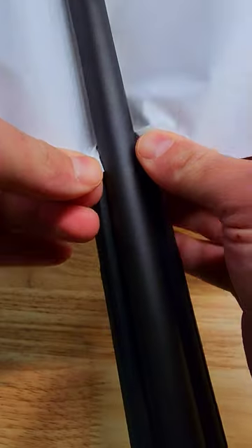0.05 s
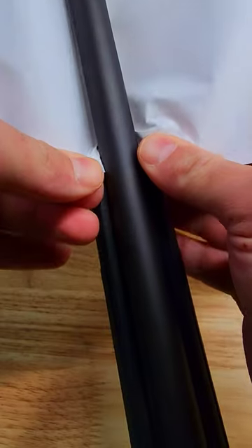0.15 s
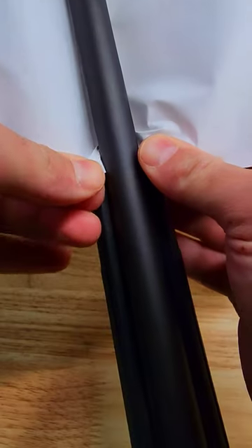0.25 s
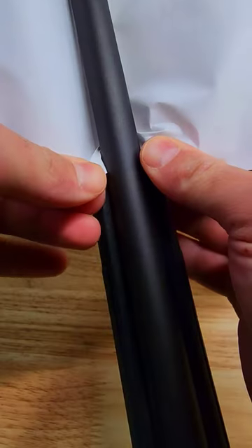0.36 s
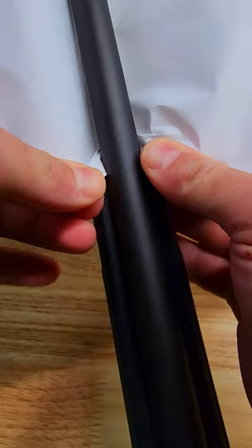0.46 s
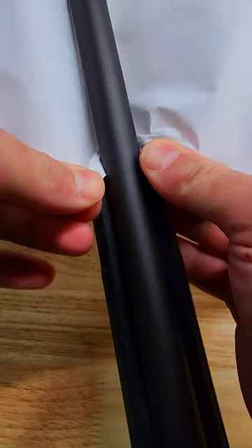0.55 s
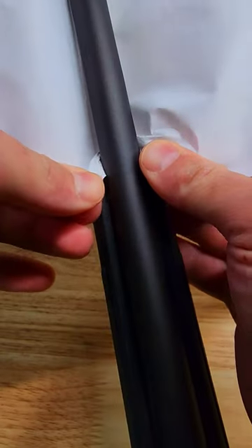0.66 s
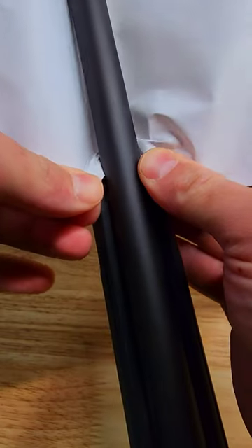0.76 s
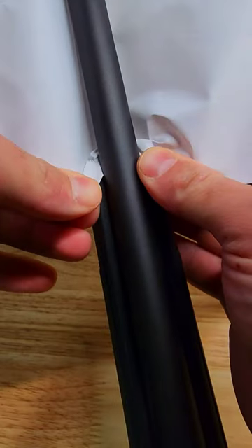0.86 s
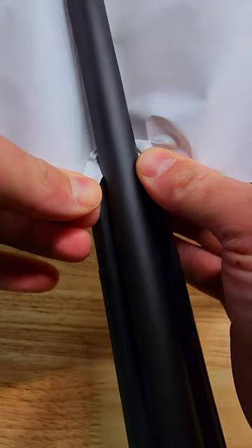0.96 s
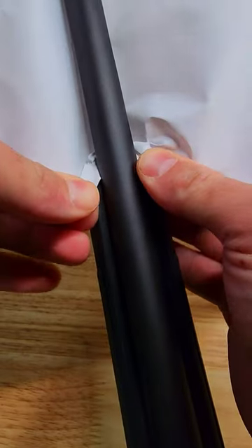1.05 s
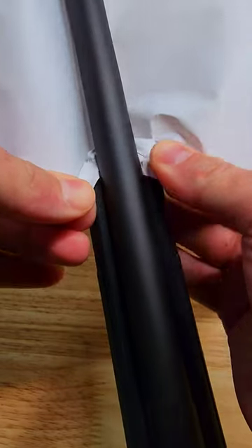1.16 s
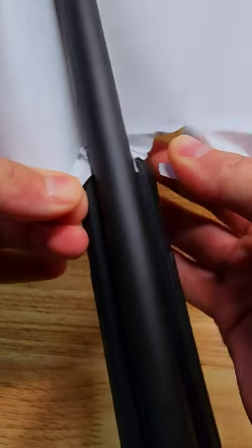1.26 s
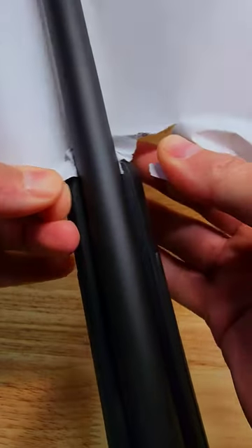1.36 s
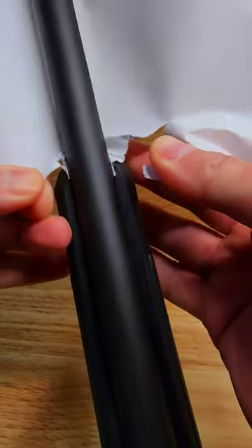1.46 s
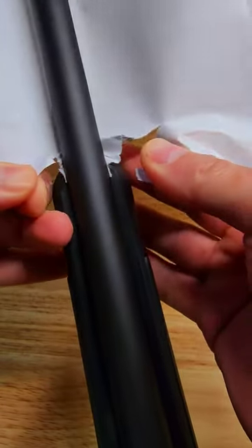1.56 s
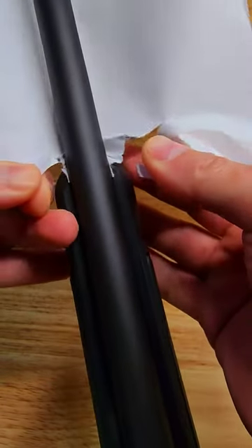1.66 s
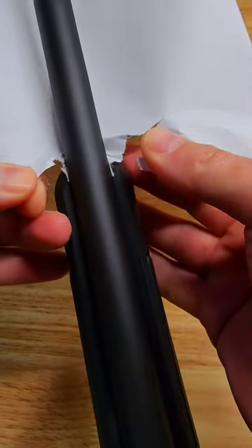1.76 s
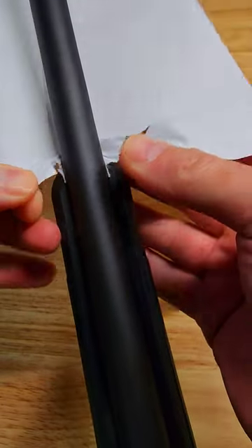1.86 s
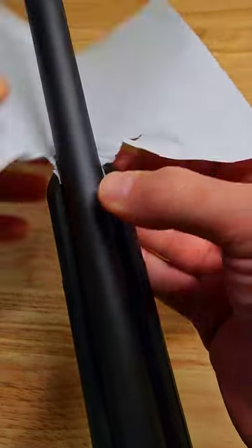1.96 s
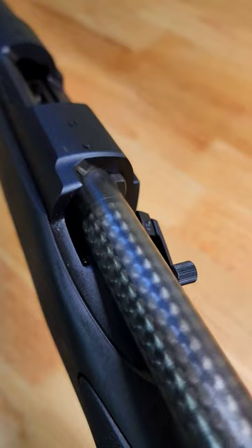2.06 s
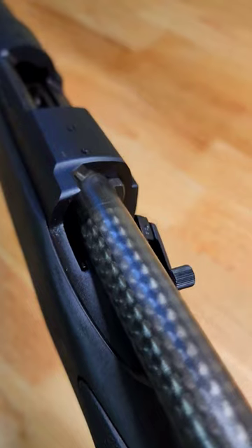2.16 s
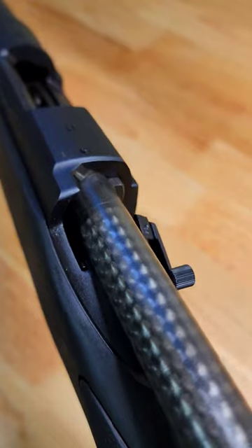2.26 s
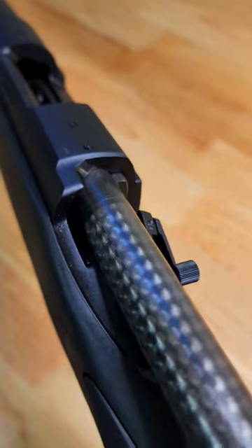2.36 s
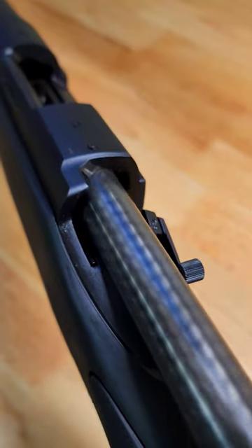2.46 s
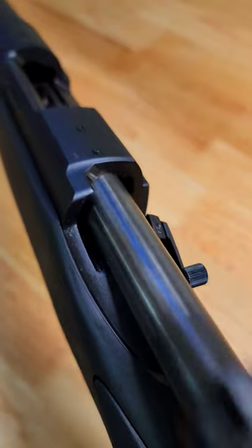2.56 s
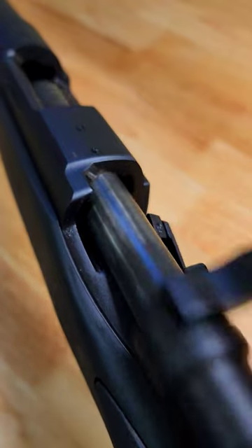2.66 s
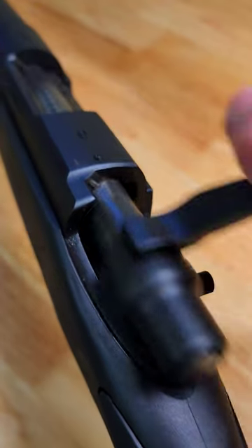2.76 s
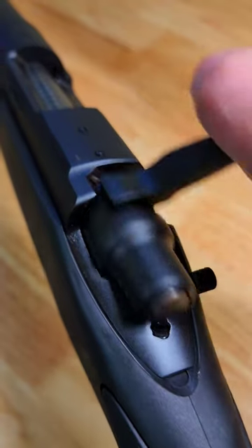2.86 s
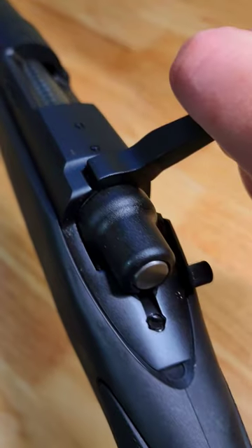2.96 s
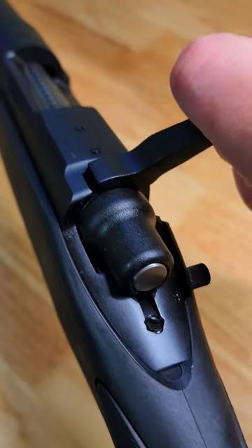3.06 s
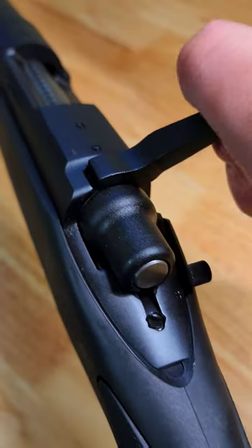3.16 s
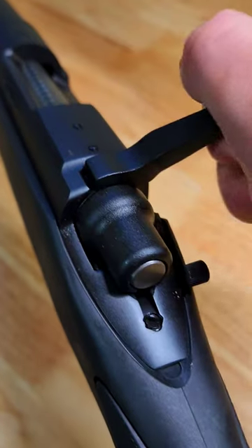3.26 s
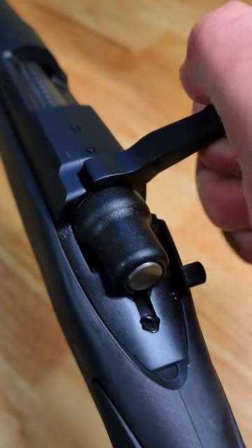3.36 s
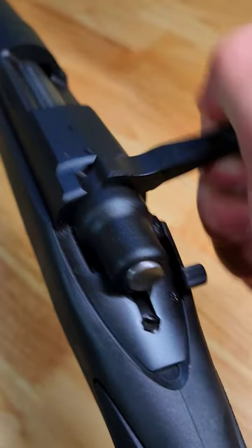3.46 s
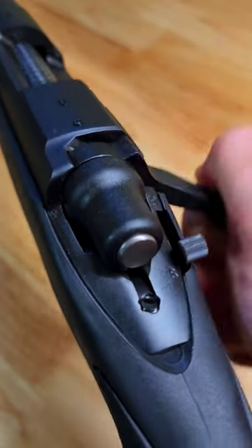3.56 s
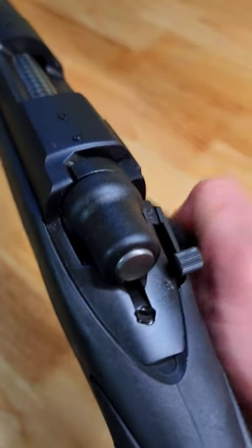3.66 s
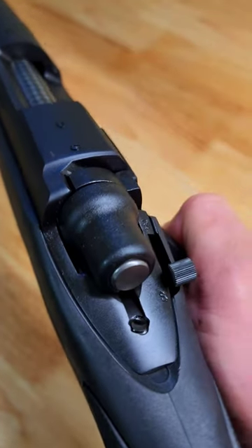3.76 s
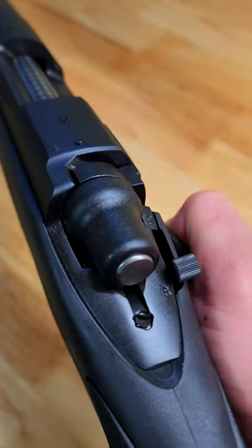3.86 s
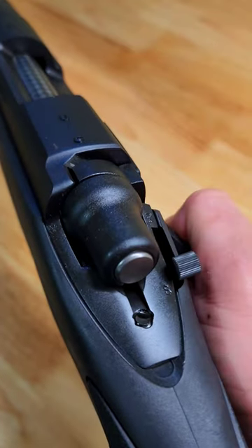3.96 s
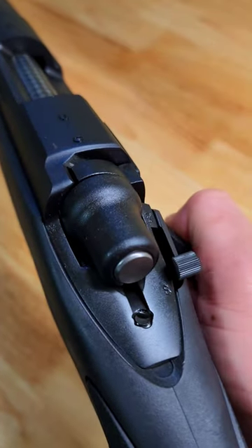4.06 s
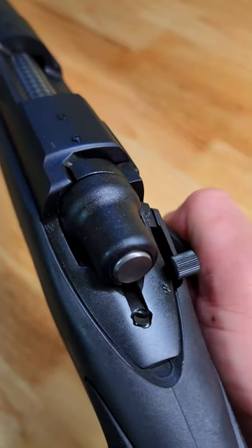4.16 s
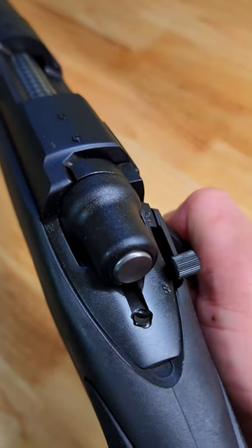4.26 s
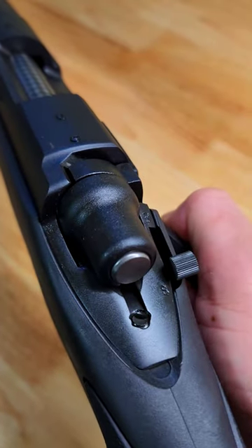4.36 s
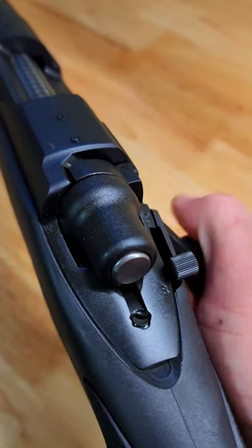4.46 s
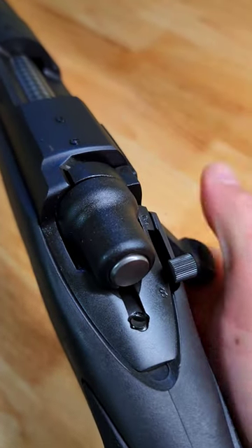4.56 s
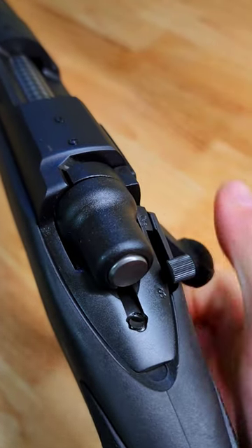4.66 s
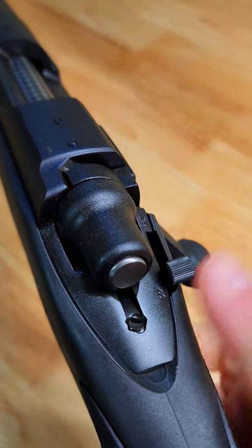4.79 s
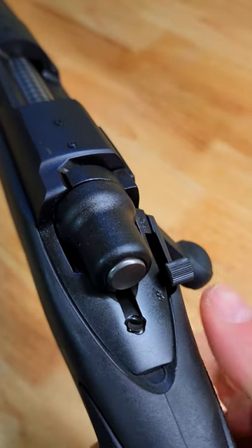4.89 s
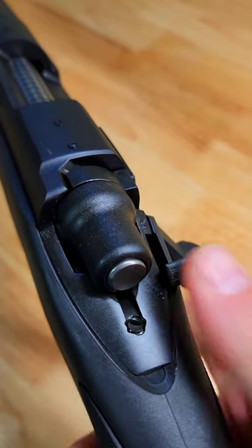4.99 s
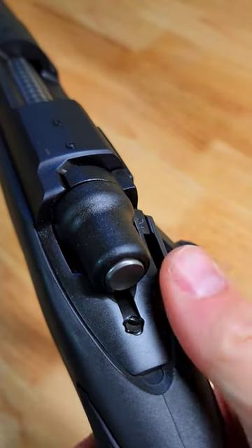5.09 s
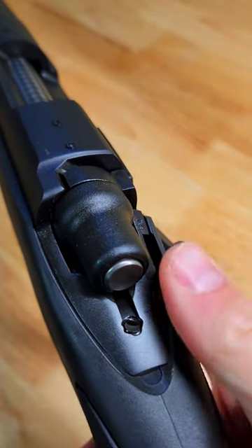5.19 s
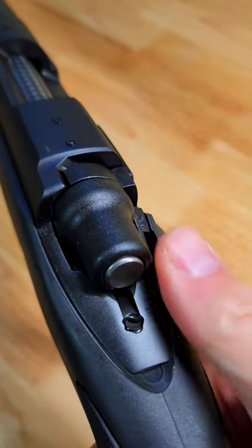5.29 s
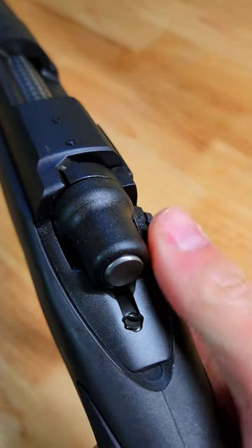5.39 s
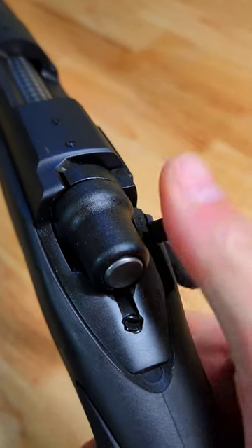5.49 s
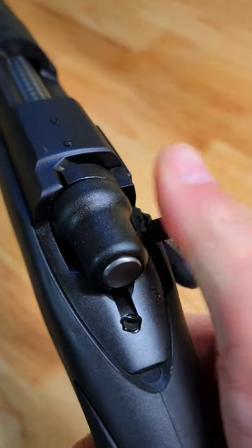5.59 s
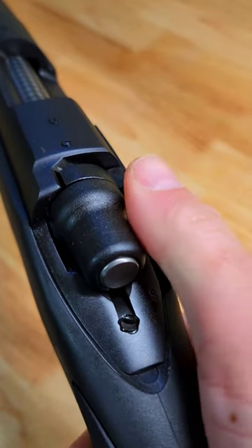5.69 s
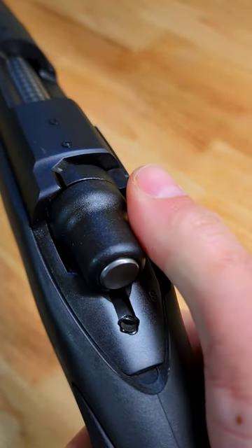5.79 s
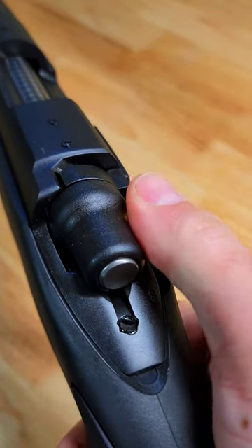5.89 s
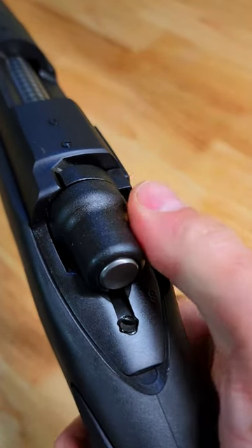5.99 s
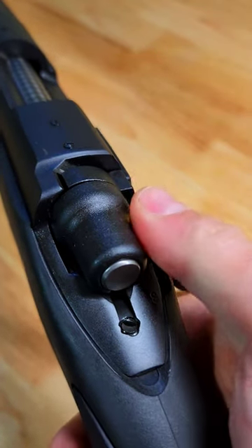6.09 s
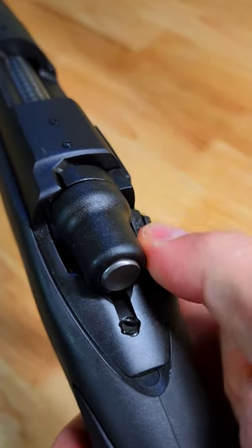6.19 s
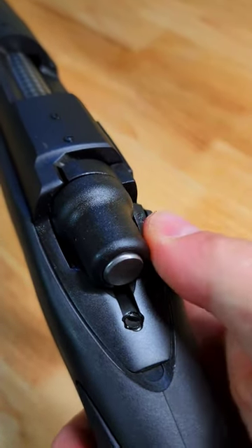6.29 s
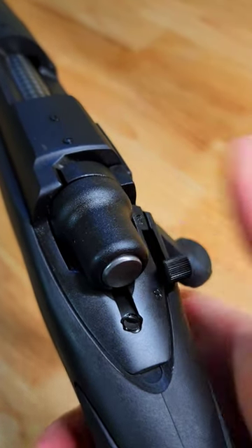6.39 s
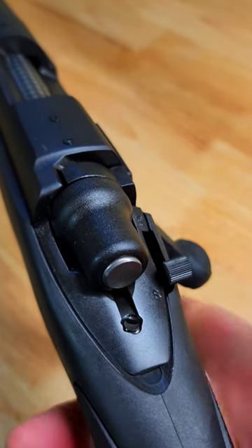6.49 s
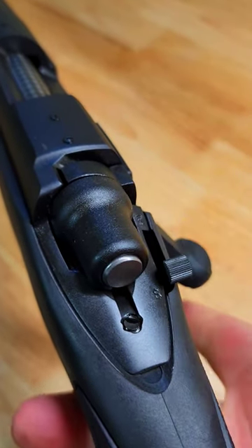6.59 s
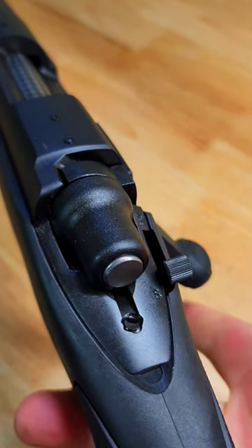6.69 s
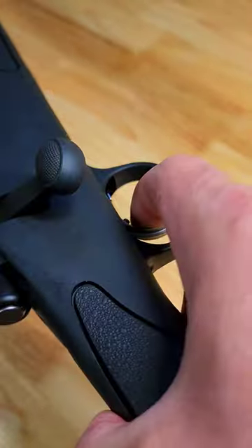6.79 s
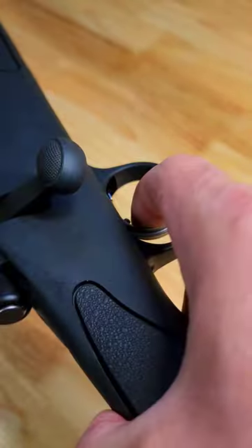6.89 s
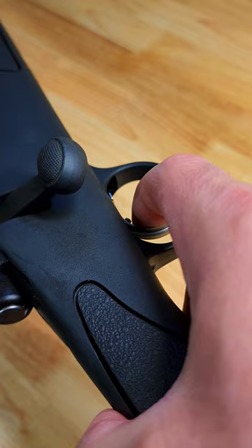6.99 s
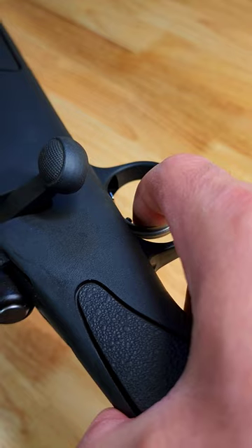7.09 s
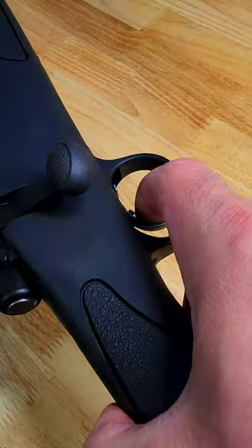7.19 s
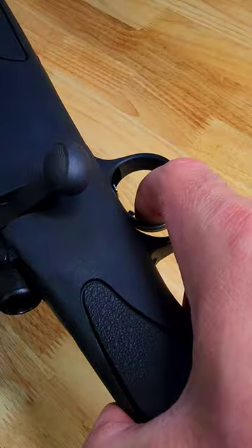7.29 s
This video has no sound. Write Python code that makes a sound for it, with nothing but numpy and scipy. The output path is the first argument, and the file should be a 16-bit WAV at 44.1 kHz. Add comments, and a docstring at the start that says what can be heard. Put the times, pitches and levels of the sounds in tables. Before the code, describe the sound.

Close indoor handling: crackling paper tears and stops abruptly, a steel bolt slides and locks, then two sharp safety lever clicks over quiet hum.

```python
"""Bolt-action rifle checked by hand

A sheet of paper dragged under the barrel rustles, snaps, rips and pops until its sound stops abruptly.
Then the bolt slides back and forward and locks, and a thumb pushes the safety lever on and off.
Friction is noise driven by tiny slips; blows are noise bursts with decaying modes of the struck part.
A small room echoes paper and action; handling sounds, still air, hum and a thin hiss lie beneath."""
import sys
import numpy as np
from scipy import signal
from scipy.io import wavfile
from scipy.ndimage import uniform_filter1d

SR = 44100
rng = np.random.default_rng(int(sys.argv[2]) if len(sys.argv) > 2 else 0)


def log_audio(samples):
    """Write samples as a 16-bit WAV file to the path given in sys.argv[1]."""
    # one column per channel
    frames = np.atleast_2d(samples).T
    # limit to full scale, then quantise
    limited = np.clip(frames, -1, 1)
    pcm = np.round(limited * 32767).astype(np.int16)
    wavfile.write(sys.argv[1], SR, pcm)


N = 323694
TIME = np.arange(N) / SR
# filters about a third of an octave wide
CENTRES = np.geomspace(32, 15000, 27)
BANK = [signal.butter(2, [hz / 1.13, hz * 1.13], "band", fs=SR, output="sos") for hz in CENTRES]


def paper():
    """Stick-slip friction and tearing: the sheet drags between barrel and stock, catches, rips and buckles."""
    drag = paper_drag()
    return np.array([panned(drag, 3.8), drag / 2]) + paper_blows()


# pulls on the sheet: (start [s], length [s], body [dB], hiss relative to body [dB])
PAPER_PULLS = [(.243, 0.048, -35.5, -6), (.335, 0.032, -37, -11), (.42, 0.72, -45, -12),
               (.98, 0.15, -43, -10), (1.255, 0.09, -44, -7), (1.47, 0.27, -41.5, -3.5),
               (1.98, 0.13, -41.5, 1.5)]
# envelope of a pull: (rise [dB/s], sag while it lasts [dB/s], release [dB/s])
PAPER_SHAPE = (940, 31, 360)
# colour of the sliding sheet: (frequency [Hz], relative density [dB per Hz])
PAPER_COLOUR = [(71, -36.5), (120, 1), (283, 5), (472, -5), (711, 1), (1100, -10.5), (1500, -9),
                (3000, -13), (8270, -16), (15900, -36)]
# rubs that wake the taut sheet: (start [s], length [s], level [dB], centre [Hz], width [octaves])
SHEET_DRONES = [(.34, 0.014, -38.5, 680, 0.48), (.6, 0.064, -44.5, 648, 0.48)]


def paper_drag():
    """Sliding friction: slips excite the sheet, its fibres break, and it drones and squeaks under tension."""
    rustle = friction(PAPER_PULLS, PAPER_SHAPE, PAPER_COLOUR,
                      slips_per_s=700, spread_db=3, slip_s=0.0022, smooth=0.8)
    return rustle + crackle() + resonant_rubs(SHEET_DRONES) + squeak()


# runs of fibres giving way under strain: (start [s], length [s], level [dB])
FIBRE_RUNS = [(0.428, 0.2, -52.5), (0.624, .014, -44), (0.65, .01, -48), (0.948, 0.06, -35),
              (1.268, 0.14, -44.5)]
FIBRES_PER_S, FIBRE_SPREAD_DB, FIBRE_DECAY_S = 400, 4, .0009
FIBRE_HZ, FIBRE_Q = (7900, 11900), 2.5   # broad resonances of a break


def crackle():
    """Random fracture: fibres break at random moments, each with a tiny bright tick of its own size."""
    sizes = from_db(FIBRE_SPREAD_DB * np.minimum(rng.exponential(1, N), 2))
    breaks = (rng.random(N) < FIBRES_PER_S / SR) * sizes
    envelope = signal.lfilter([1], [1, -np.exp(-1 / (FIBRE_DECAY_S * SR))], breaks + 1e-18)
    ticks = envelope * rng.standard_normal((2, N))
    bright = sum(signal.lfilter(*signal.iirpeak(hz, FIBRE_Q, fs=SR), ticks) / (k + 1)
                 for k, hz in enumerate(FIBRE_HZ))
    return rms_one(bright) * loudest_stroke(FIBRE_RUNS, RUB_SHAPE)


SQUEAK_S, SQUEAK_LENGTH_S, SQUEAK_DB = 2.046, 0.068, -43
SQUEAK_HZ, SQUEAK_RISE_HZ_PER_S, SQUEAK_WOBBLE_HZ = 1610, 2300, 75


def squeak():
    """Tonal stick-slip: the last pull squeaks against the barrel, wavering and rising in pitch."""
    wobble = rms_one(uniform_filter1d(rng.standard_normal(N), size=60))
    rise = SQUEAK_RISE_HZ_PER_S * np.clip(TIME - SQUEAK_S, 0, SQUEAK_LENGTH_S)
    hz = SQUEAK_HZ + rise + SQUEAK_WOBBLE_HZ * wobble
    tone = np.sqrt(2) * np.sin(2 * np.pi * np.cumsum(hz) / SR)
    return from_db(SQUEAK_DB) * stroke(SQUEAK_S, SQUEAK_LENGTH_S, PAPER_SHAPE) * tone


# blows of the sheet as it snaps, crinkles, buckles and rasps;
# among the pops, the weak one at 1.635 s is an early echo of the big pop before it:
# (time [s], level before the gains below [dB], contact [s], brightness [dB per octave])
PAPER_SNAPS = [(.8882, -3.5, 0.0003, 0.36)]
PAPER_TICKS = [(.783, -33.5, 0.00086, 1.2), (.864, -22.5, .003, 0), (.9052, -13, 0.0014, 0.48),
               (.9368, -3, 0.0029, 0.54), (.9497, -6, 0.0004, 1.3), (.9562, -7.5, 0.00034, 0.57),
               (.995, -21.5, .001, 1.5), (1.231, -39.5, 0.0011, 1.3), (1.314, -11.5, 0.0052, 0),
               (1.327, -11.5, .0038, .4)]
PAPER_POPS = [(1.6131, -2.5, 0.00059, 6.5), (1.635, -31, 0.0017, -8), (1.888, -21, 0.0022, -2),
              (1.8945, -23.5, 0.0024, -2.5), (1.941, -24.5, 0.003, 4.5), (1.9645, -19.5, 0.0023, -3.5),
              (2.042, -24.5, 0.0054, 2)]
PAPER_RASPS = [(1.3865, -7, 0.046, 0.8), (1.442, -16.5, 0.0093, -0.4), (1.514, -20.5, 0.019, -3),
               (1.807, -38, 0.027, 1), (2.126, -19, 0.012, -0.5)]
# colour of each contact: (frequency [Hz], relative density [dB per Hz])
SNAP_COLOUR = [(94, -28.5), (160, 2), (270, -1.5), (419, -13), (700, -4), (2610, -6), (7510, -7.5),
               (10000, -30.5), (11900, -17), (15900, -38)]
TICK_COLOUR = [(88, -24), (150, -1.5), (900, -17), (3470, -15.5), (8520, -6), (15900, -16)]
POP_COLOUR = [(100, -14), (400, -14), (1100, -3), (2000, -4), (7400, -17), (11800, -24.5), (16000, -67)]
# ringing of the taut sheet: (frequency [Hz], relative level [dB], t60 [s])
SHEET_MODES = [(662, -1, .021), (1400, -15, .018)]
# short, strong clack of a snap: (frequency [Hz], relative level [dB], t60 [s])
SNAP_CLACK = [(1500, -3.5, 0.018), (2550, -8.5, 0.031)]


def paper_blows():
    """Impulsive excitation: short noise bursts of the sheet, each with its modes ringing."""
    snaps = blows(PAPER_SNAPS, SNAP_COLOUR, SHEET_MODES, decay_s=0.0025,
                  gain_db=15, ring_db=-11, room_db=1.5, pan_db=4, clack=SNAP_CLACK)
    ticks = blows(PAPER_TICKS, TICK_COLOUR, SHEET_MODES, decay_s=0.0013,
                  gain_db=11, ring_db=-16.5, room_db=7, pan_db=7)
    pops = blows(PAPER_POPS, POP_COLOUR, SHEET_MODES, decay_s=0.0041,
                 gain_db=9.5, ring_db=4.5, room_db=0.5, pan_db=3.5)
    rasps = blows(PAPER_RASPS + rip(count=7), SNAP_COLOUR, SHEET_MODES, decay_s=0.0013,
                  gain_db=22.5, ring_db=0, room_db=1, pan_db=3)
    return snaps + ticks + pops + rasps


RIP_S, RIP_GAP_S, RIP_JITTER_S, RIP_CONTACT_S = 1.3885, .0069, .0008, .0005
RIP_DB, RIP_SPREAD_DB = -13, 5   # before the gains of the rasps
RIP_TILT_DB, RIP_DULLING_DB = 4, .6   # brightness of the first snap per octave; loss per snap


def rip(count):
    """Crack propagation: fibres give way one after another, unevenly, and duller as the tension drops."""
    rows = []
    for k, (shift, strength) in enumerate(rng.uniform(-1, 1, (count, 2))):
        s = RIP_S + k * RIP_GAP_S + RIP_JITTER_S * shift
        level_db = RIP_DB + RIP_SPREAD_DB * strength
        rows.append((s, level_db, RIP_CONTACT_S, RIP_TILT_DB - k * RIP_DULLING_DB))
    return rows


def action():
    """Friction and impact: the bolt scrapes and locks, and the safety snaps over its detent."""
    slide = bolt_slide()
    return np.array([slide, slide / 2]) + action_blows()


# strokes of the bolt: (start [s], length [s], body before resonances [dB], hiss relative to body [dB])
BOLT_STROKES = [(2.615, 0.033, -31, -3.5), (2.65, 0.14, -34, -0.5), (2.865, 0.24, -36, -3),
                (3.075, 0.04, -29, -1.5), (3.64, 0.02, -38.5, -7)]
# envelope of a bolt stroke: (rise [dB/s], sag while it lasts [dB/s], release [dB/s])
BOLT_SHAPE = (830, 51, 167)
# colour of steel on steel: (frequency [Hz], relative density [dB per Hz])
STEEL_COLOUR = [(88, -34), (150, 0.5), (217, -20.5), (291, -4.5), (414, -10.5), (788, -4.5), (1790, -12),
                (4650, -16), (13500, -28), (15900, -47.5)]
# the bolt drags as it nears the chamber: (start [s], length [s], level [dB], centre [Hz], width [octaves])
BOLT_BINDS = [(3.055, .035, -34.5, 1053, .5)]
STOCK_HZ, STOCK_Q = 300, 5   # hollow resonance of the stock


def bolt_slide():
    """Resonator driven by friction: scraping along the receiver makes stock and barrel sound along."""
    scrape = friction(BOLT_STROKES, BOLT_SHAPE, STEEL_COLOUR,
                      slips_per_s=1400, spread_db=5, slip_s=0.0045, smooth=0.43)
    drone = from_db(2) * signal.lfilter(*signal.iirpeak(STOCK_HZ, STOCK_Q, fs=SR), scrape)
    body = scrape + drone
    barrel = from_db(-22.5) * energy_one(ringing(RIFLE_MODES))
    singing = signal.fftconvolve(body, barrel, axes=-1)[:, :N]
    return body + singing + resonant_rubs(BOLT_BINDS)


# blows of bolt, lock, safety lever and hand:
# (time [s], level before the gains below [dB], contact [s], brightness [dB per octave])
BOLT_STOPS = [(2.664, -15, 0.0046, -2.5), (2.6851, -0.5, 0.00026, 4), (2.866, -35.5, 0.004, 7.5),
              (2.932, -29.5, 0.0063, 5), (3.074, -27.5, .006, -3.5), (3.0893, 0, 0.0013, -2.5)]
BOLT_LOCKS = [(3.6592, -5.5, 0.002, 0.65), (3.6712, -13, 0.0034, 0.015)]
SAFETY_ON = [(5.5125, -8.5, .001, 0.3), (5.5143, 2.5, 0.0004, 1)]
SAFETY_OFF = [(6.3322, 2.64, 0.0011, -.3)]
HAND_TAPS = [(3.8605, -16.5, 0.002, 3), (4.675, -41, 0.0024, 9.5), (6.878, -29.5, 0.0022, 5.5),
             (6.977, -41.5, 0.0023, 8)]
# colour of each contact: (frequency [Hz], relative density [dB per Hz])
STOP_COLOUR = [(150, -48), (547, -10), (2790, -2), (6850, 7.5), (10000, -12), (13000, -4), (15900, -28.5)]
LOCK_COLOUR = [(47, -36), (80, 5.5), (900, 6.5), (1900, 0.5), (3940, 5), (7300, 2), (10900, -11),
               (15900, -44)]
LEVER_COLOUR = [(88, -58.5), (150, -4.5), (380, -18), (560, -11), (1500, -8.5), (3000, -8), (7300, -4.5),
                (9500, -21.5), (15900, -16)]
TAP_COLOUR = [(50, 17.5), (169, 3), (422, -15.5), (1200, -17.5), (2700, -37), (15000, -68)]
# ringing of barrel and action: (frequency [Hz], relative level [dB], t60 [s])
RIFLE_MODES = [(297.7, -2, 0.32), (392, -18.5, 0.17), (555, -10, 0.11), (974, -12, 0.17),
               (1460, -20.5, 0.37), (3950, -21.5, 0.13), (5750, -25.5, 0.31), (7300, -28.5, 0.3)]
# short, strong clack of the struck part: (frequency [Hz], relative level [dB], t60 [s])
STOP_CLACK = [(1130, -20, .02), (4540, -6.5, .012), (5510, -10.5, .012)]
LOCK_CLACK = [(1320, -10, 0.014), (3100, 1, 0.007), (5580, -6.5, 0.036)]
SAFETY_ON_CLACK = [(986, -23, 0.09), (1508, -4, 0.0089), (1803, -8, 0.012), (2270, -10.5, 0.026),
                   (4500, -9.5, 0.025), (7900, -32, 0.015)]
SAFETY_OFF_CLACK = [(980, -16, 0.038), (2820, -3.5, 0.011), (5830, -3, 0.0098), (6150, -39.5, .2)]


def action_blows():
    """Modal excitation by impact: each blow wakes the same barrel and action modes to a different degree."""
    stops = blows(BOLT_STOPS, STOP_COLOUR, RIFLE_MODES, decay_s=0.0022,
                  gain_db=15, ring_db=-35.5, room_db=2.5, pan_db=-2, clack=STOP_CLACK)
    locks = blows(BOLT_LOCKS, LOCK_COLOUR, RIFLE_MODES, decay_s=0.002,
                  gain_db=18, ring_db=-12.5, room_db=3.5, pan_db=-6, clack=LOCK_CLACK)
    safety_on = blows(SAFETY_ON, LEVER_COLOUR, RIFLE_MODES, decay_s=0.0017,
                      gain_db=13, ring_db=-32, room_db=-2.5, pan_db=-3.5, clack=SAFETY_ON_CLACK)
    safety_off = blows(SAFETY_OFF, LEVER_COLOUR, RIFLE_MODES, decay_s=0.00051,
                       gain_db=11, ring_db=-24, room_db=-4, pan_db=-2, clack=SAFETY_OFF_CLACK)
    taps = blows(HAND_TAPS, TAP_COLOUR, RIFLE_MODES, decay_s=0.0018,
                 gain_db=10, ring_db=-26, room_db=-0.5, pan_db=2)
    return stops + locks + safety_on + safety_off + taps


# skin brushing the stock: (start [s], length [s], body before a 5.5 dB gain [dB], hiss relative to body [dB])
SKIN_RUBS = [(4.735, 0.1, -61.5, 0), (4.85, 0.18, -59.5, 1), (5.11, 0.065, -56, -5),
             (5.79, 0.041, -57.5, -5), (6.53, 0.17, -63, -1)]
# colour of skin on the stock: (frequency [Hz], relative density [dB per Hz])
SKIN_COLOUR = [(100, -8.5), (330, 3), (1100, -13), (2300, -12), (3200, -21), (16000, -28)]
# fingers on stock and trigger guard, the narrowest a faint squeak:
# (start [s], length [s], level [dB], centre [Hz], width [octaves])
GRIP_RUBS = [(2.44, 0.036, -64.5, 2378, 1.8), (4.43, 0.057, -69, 2673, 1.56),
             (4.64, .012, -56.5, 1110, 0.46), (4.72, 0.074, -50, 484, 0.89), (5.0, .32, -63.5, 2195, 0.075),
             (6.78, 0.04, -65, 3260, 1.01), (6.885, .055, -57.5, 814, .6)]
# jolts of the stock at hard tugs on the sheet: (start [s], length [s], level before panning [dB])
PAPER_TUGS = [(.89, 0.007, -30), (1.39, 0.047, -36.5), (1.52, 0.017, -34.5)]
# the stock shifting in the hands: (start [s], length [s], level [dB])
GRIP_SHIFTS = [(4.65, 0.067, -44.5), (5.25, 0.33, -42), (6.4, 0.17, -44)]
# envelopes of rub, jolt and shift: (rise [dB/s], sag while it lasts [dB/s], release [dB/s])
SKIN_SHAPE = (330, 12, 250)
TUG_SHAPE = (1100, 68, 380)
GRIP_SHAPE = (59, 2.5, 19.6)
THUD_HZ, THUD_DB, THUD_T60_S = 49, -30.5, 0.5


def hands():
    """Soft contact and rigid-body motion: skin brushes the stock, which jolts, shifts and thuds once."""
    rub = from_db(5.5) * friction(SKIN_RUBS, SKIN_SHAPE, SKIN_COLOUR,
                                  slips_per_s=2800, spread_db=2, slip_s=0.00087, smooth=1.2)
    jolts = panned(rumble(PAPER_TUGS, TUG_SHAPE, low_hz=67.57, high_hz=134), 8.5)
    shifts = rumble(GRIP_SHIFTS, GRIP_SHAPE, low_hz=53.7, high_hz=116)
    # the whole rifle bobs as the bolt handle lands
    since = np.maximum(TIME - BOLT_LOCKS[-1][0], 0)
    thud = from_db(THUD_DB - 60 * since / THUD_T60_S) * np.sin(2 * np.pi * THUD_HZ * since)
    return rub + resonant_rubs(GRIP_RUBS) + thud + jolts + shifts


def rumble(rows, shape, low_hz, high_hz):
    """Band-limited noise: the low, dull sound of the stock being moved."""
    band = signal.butter(2, [low_hz, high_hz], "band", fs=SR, output="sos")
    noise = signal.sosfilt(band, rng.standard_normal(N))
    return rms_one(noise) * loudest_stroke(rows, shape)


# colour of the still room: (frequency [Hz], relative density [dB per Hz])
AIR_COLOUR = [(25, -31), (48, -2), (135, -11), (510, -23.5), (730, -21), (1100, -32.5), (2300, -40.5),
              (7500, -50.5), (16000, -58)]
# mains hum: (frequency [Hz], level [dB rms])
HUM = [(59.6, -54), (119, -55)]
AIR_DB, HISS_HZ, HISS_DB = -51.5, 7430, -76


def background():
    """Stationary noise and steady tones: room air, mains hum and a thin narrow-band hiss."""
    air = from_db(AIR_DB) * rms_one(coloured(np.ones(N), AIR_COLOUR))
    hum = sum(from_db(db) * np.sqrt(2) * np.sin(2 * np.pi * (hz * TIME + rng.random())) for hz, db in HUM)
    narrow = signal.butter(2, [HISS_HZ - 170, HISS_HZ + 170], "band", fs=SR, output="sos")
    hiss = from_db(HISS_DB) * rms_one(signal.sosfilt(narrow, rng.standard_normal((2, N))))
    return air + hum + hiss


CLACK_ROOM_DB = -4   # the small parts face the microphone and send less to the room


def blows(rows, spectrum, modes, decay_s, gain_db, ring_db, room_db, pan_db, clack=()):
    """Impact: parts chatter during contact, clack briefly and leave the body ringing: (direct, sent to room)."""
    body, clacks = np.zeros((2, N)), np.zeros((2, N))
    t = TIME[:SR // 12]
    for s, level_db, contact_s, tilt_db in rows:
        chatter = np.exp(-np.maximum(t - contact_s, 0) / decay_s)
        add(body, s, from_db(level_db + gain_db) * coloured(chatter, spectrum, tilt_db))
        add(body, s, from_db(level_db + ring_db) * ringing(modes))
        if clack:
            add(clacks, s, from_db(level_db) * clacking(clack, count=3))
    sent = from_db(room_db) * (body + from_db(CLACK_ROOM_DB) * clacks)
    return np.array([panned(body + clacks, pan_db), sent])


def ringing(modes):
    """Modal decay: long modes take a moment to swell; phases of high modes are unrelated at the two sides."""
    t, out = TIME[:SR // 3], 0
    for hz, db, t60 in modes:
        phase = rng.normal(0, min((hz / 800) ** 2, 3), (2, 1))
        decay = from_db(db - 60 * np.minimum(t / t60, 4))
        swell = 1 - np.exp(-t / (.02 * t60))
        out = out + decay * swell * np.sin(2 * np.pi * hz * t + phase)
    return out


CLACK_SPREAD = .03   # standard deviation of the modes in a cluster, as a share of their pitch


def clacking(modes, count):
    """Mode splitting: each resonance of a struck part is a cluster of close modes that share its energy."""
    out = 0
    for hz, db, t60 in modes:
        amount = np.linalg.norm(ringing([(hz, db, t60)]), axis=1, keepdims=True)
        cluster = [(hz * (1 + CLACK_SPREAD * rng.normal()), db, t60) for _ in range(count)]
        out = out + amount * energy_one(ringing(cluster))
    return out


def friction(strokes, shape, spectrum, slips_per_s, spread_db, slip_s, smooth):
    """Stick-slip: uneven slips over smooth noise; strokes set the body up to 3 kHz and the hiss above."""
    first = int(strokes[0][0]) * SR
    last = min(int(strokes[-1][0] + 1.5) * SR, N)
    count = last - first
    sizes = from_db(spread_db * np.minimum(rng.exponential(1, count), 4))
    slips = (rng.random(count) < slips_per_s / SR) * sizes
    drive = smooth + rms_one(signal.lfilter([1], [1, -np.exp(-1 / (slip_s * SR))], slips))
    ranges = np.zeros((2, 2, count))   # body and hiss, each in stereo
    for hz, band in stereo_bands(drive):
        ranges[int(hz > 3000)] += band * wander(count) * from_db(at_hz(spectrum, hz))
    gains = np.zeros((2, N))
    for start_s, length_s, body_db, hiss_db in strokes:
        levels = from_db([[body_db], [body_db + hiss_db]])
        gains = np.maximum(gains, levels * stroke(start_s, length_s, shape))
    out = np.zeros((2, N))
    for gain, part in zip(gains, ranges):
        out[:, first:last] += gain[first:last] * rms_one(part)
    return out


WANDER_DB, WANDER_PER_S = 2.5, 45   # a moving contact favours ever different bands


def wander(count):
    """Random modulation: a gain drifts as the point of contact moves."""
    steps = TIME[:count] * WANDER_PER_S
    gains = from_db(WANDER_DB * rng.standard_normal(int(steps[-1]) + 2))
    return np.interp(steps, np.arange(len(gains)), gains)


# envelope of a resonant rub or fibre run: (rise [dB/s], sag while it lasts [dB/s], release [dB/s])
RUB_SHAPE = (900, 33, 230)


def resonant_rubs(rows):
    """Selective excitation: each rub drives one resonance with noise under the envelope of its stroke."""
    white, out = rng.standard_normal(N), 0
    for start_s, length_s, db, hz, octaves in rows:
        half_width = 2 ** (octaves / 2)
        band = signal.butter(2, [hz / half_width, hz * half_width], "band", fs=SR, output="sos")
        resonance = rms_one(signal.sosfilt(band, white))
        out = out + from_db(db) * stroke(start_s, length_s, RUB_SHAPE) * resonance
    return out


def stroke(start_s, length_s, shape):
    """Exponential envelope: the gain swells up to its start, sags while it lasts and dies away."""
    rise, sag, release = shape
    since = TIME - start_s
    db = rise * np.minimum(since, 0) - sag * np.clip(since, 0, length_s)
    db = db - release * np.maximum(since - length_s, 0)
    return from_db(np.maximum(db, -200))


def loudest_stroke(rows, shape):
    """Envelope maximum: where strokes overlap, the loudest sets the gain."""
    return np.max([from_db(db) * stroke(s, length_s, shape) for s, length_s, db in rows], axis=0)


def coloured(drive, spectrum, tilt_db=0):
    """Spectral shaping: driven noise with a given density and tilt about 3 kHz, unit energy a side."""
    out = 0
    for hz, band in stereo_bands(drive):
        density_db = at_hz(spectrum, hz) + tilt_db * np.log2(hz / 3000)
        out = out + energy_one(band) * np.sqrt(hz) * from_db(density_db)   # bandwidth grows with hz
    return energy_one(out)


# likeness of the two sides: (frequency [Hz], correlation [0 to 1])
LIKENESS = [(60, 0.94), (250, .85), (700, 0.34), (1500, 0.28)]


def stereo_bands(drive):
    """Interaural coherence: driven noise in narrow bands whose two sides agree most in the bass."""
    white = rng.standard_normal((2, 2, len(drive))) * drive + 1e-18
    for k, (hz, sos) in enumerate(zip(CENTRES, BANK)):
        mid, side = white[k % 2]   # neighbouring bands use separate noise
        alike = np.clip(at_hz(LIKENESS, hz), 0, 1)
        pair = np.sqrt(1 + alike) * mid + np.sqrt(1 - alike) * side * [[1], [-1]]
        yield hz, signal.sosfilt(sos, pair)


def from_db(db):
    """Logarithmic level: decibels to gain."""
    return 10 ** (np.asarray(db) / 20)


def rms_one(x):
    """Power normalisation: scaled to unit rms."""
    return x / np.sqrt(np.mean(x ** 2) + 1e-20)


def energy_one(x):
    """Energy normalisation: scaled to unit energy in each channel."""
    return x / np.sqrt(np.sum(x ** 2, axis=-1, keepdims=True) + 1e-20)


def at_hz(points, hz):
    """Logarithmic pitch: a table read on a log-frequency axis."""
    table = np.array(points)
    return np.interp(np.log(hz), np.log(table[:, 0]), table[:, 1])


def add(track, s, sound):
    """Superposition: mixes a sound into the track at time s."""
    start = int(s * SR)
    track[:, start:start + sound.shape[-1]] += sound[:, :N - start]


def panned(x, pan_db):
    """Level difference: left louder than right by pan_db."""
    return x * from_db(pan_db * np.array([[.5], [-.5]]))


# reverberation of the room: (frequency [Hz], t60 [s])
ROOM_T60 = [(600, 0.23), (6000, 0.4), (14000, 0.045)]
# strength of the echoes: (frequency [Hz], echo relative to the sound sent [dB])
ROOM_DB = [(150, -3.5), (600, -6), (2000, -9.5), (6000, -12.5), (10000, -13), (14000, -2.5)]


def room_response():
    """Diffuse reverberation: echoes build up over a few milliseconds and die band by band."""
    t, out = TIME[:SR * 2 // 3], 0
    build_up = 1 - np.exp(-(t / 0.001) ** 2)
    for hz, band in stereo_bands(build_up):
        decaying = energy_one(band * from_db(-60 * t / at_hz(ROOM_T60, hz)))
        out = out + decaying * np.sqrt(hz / (2 * SR)) * from_db(at_hz(ROOM_DB, hz))
    return out


FAR_PORT_LAG = 12   # samples by which direct sound reaches the right port later


def in_room(direct, sent, responses):
    """Precedence: direct sound comes first at the left; each radiated side takes its own way round the room."""
    left, right = direct
    echoes = sum(signal.fftconvolve(side[None], response, axes=-1)[:, :N]
                 for side, response in zip(sent, responses))
    return np.array([left, np.roll(right, FAR_PORT_LAG)]) + echoes / np.sqrt(2)


PAPER_END_S = 2.143


def scene():
    """Superposition of sources: paper, cut off with its echoes, then the action; hands and still room below."""
    room = [room_response(), room_response()]
    paper_check = in_room(*paper(), room) * (TIME < PAPER_END_S)
    return paper_check + in_room(*action(), room) + hands() + background()


CUTOFF_HZ = 15900


def record(dry):
    """Saturation and band limiting: the sharpest clicks overload the input, and the top is cut."""
    clipped = dry / (1 + dry ** 4) ** .25
    low_pass = signal.ellip(10, .2, 70, CUTOFF_HZ, fs=SR, output="sos")
    return signal.sosfilt(low_pass, clipped)


dry = scene()
out = record(dry)
log_audio(out)
```